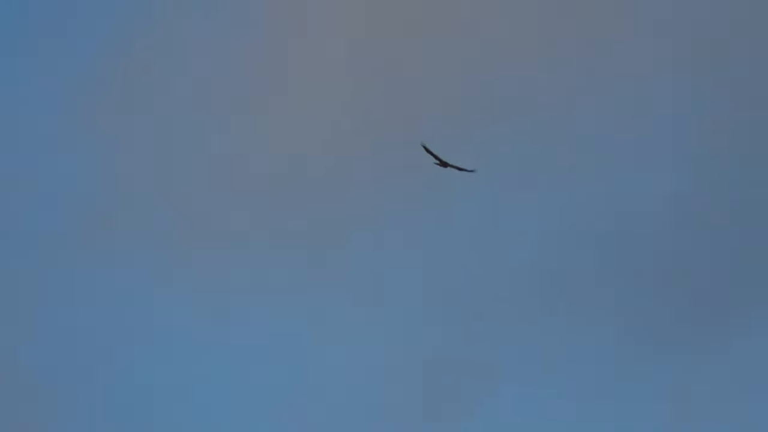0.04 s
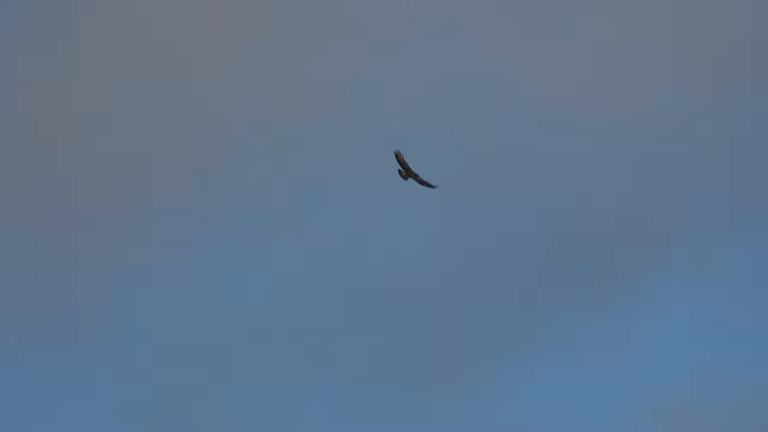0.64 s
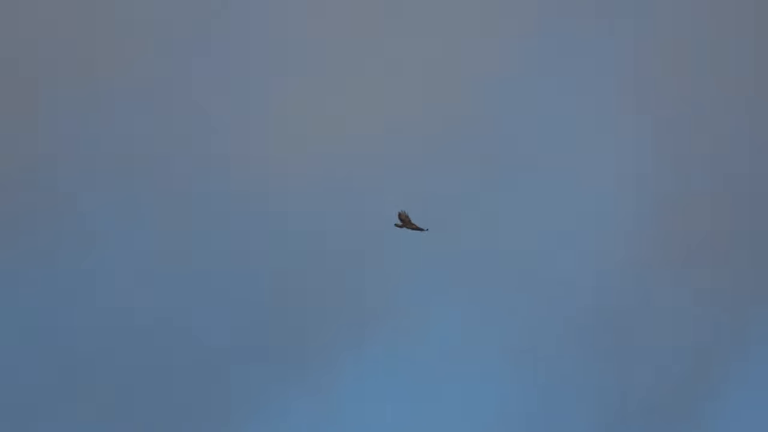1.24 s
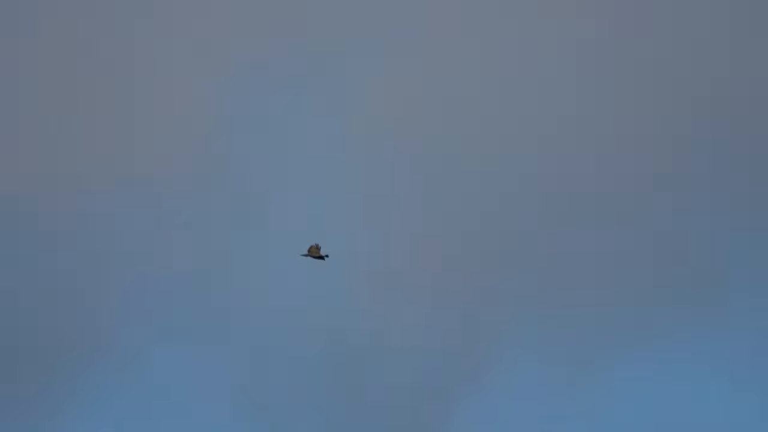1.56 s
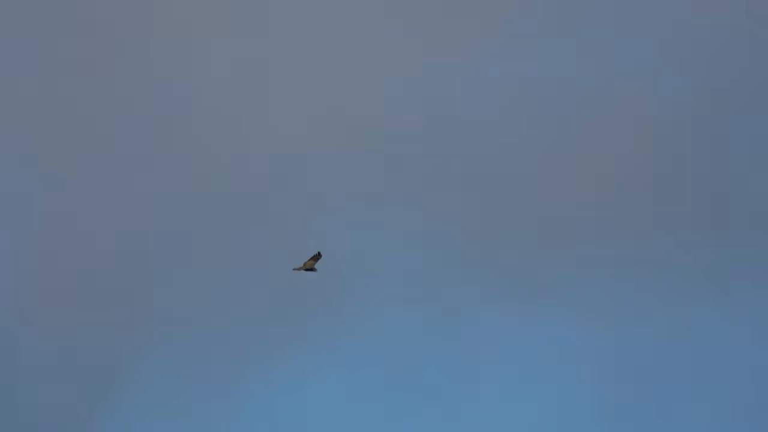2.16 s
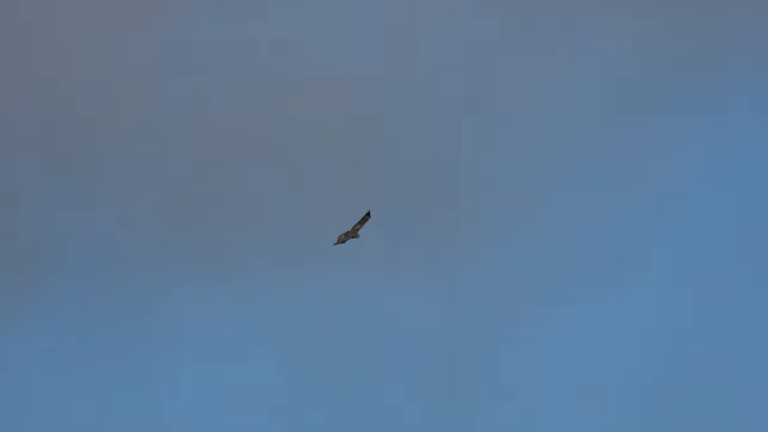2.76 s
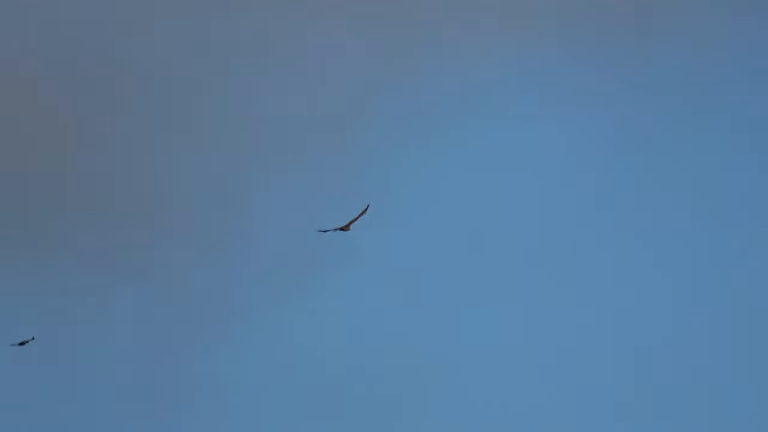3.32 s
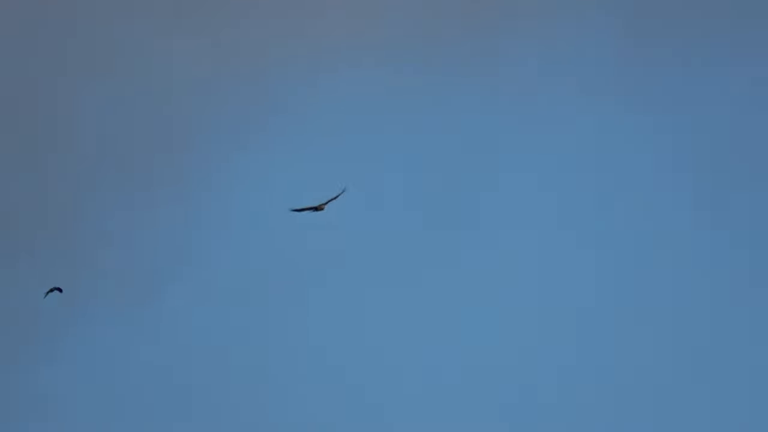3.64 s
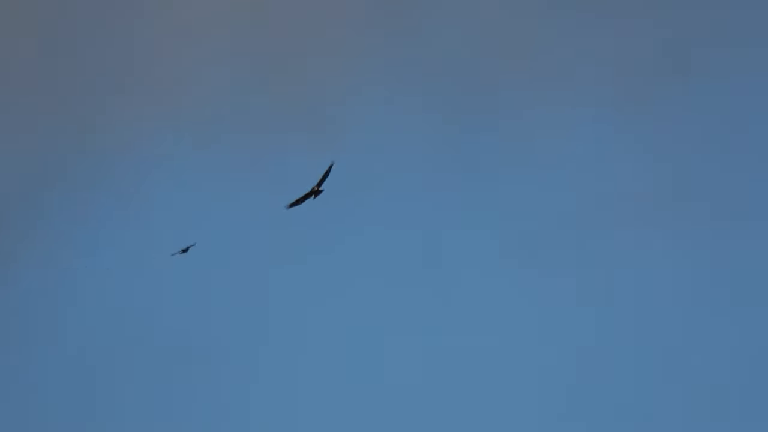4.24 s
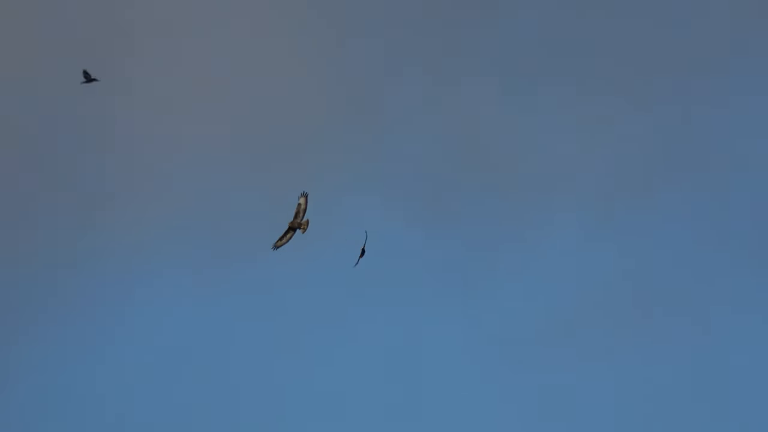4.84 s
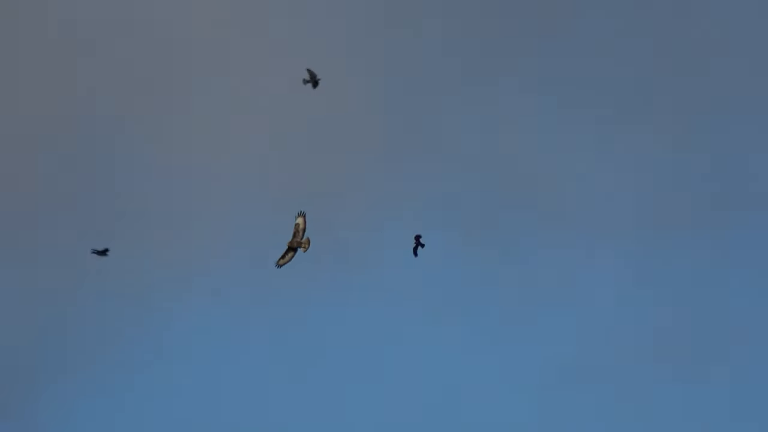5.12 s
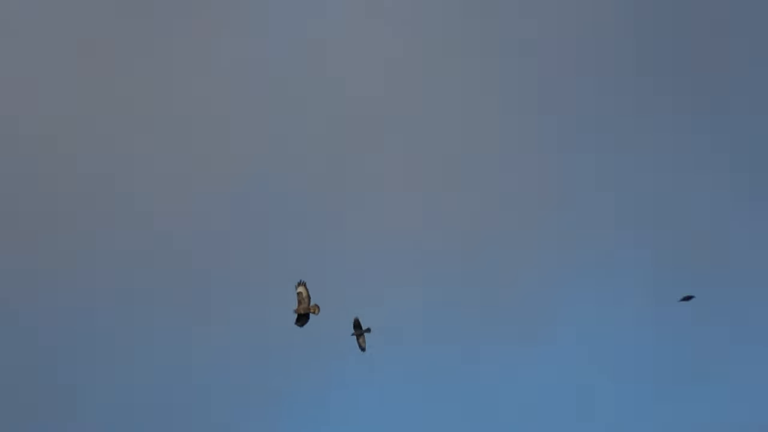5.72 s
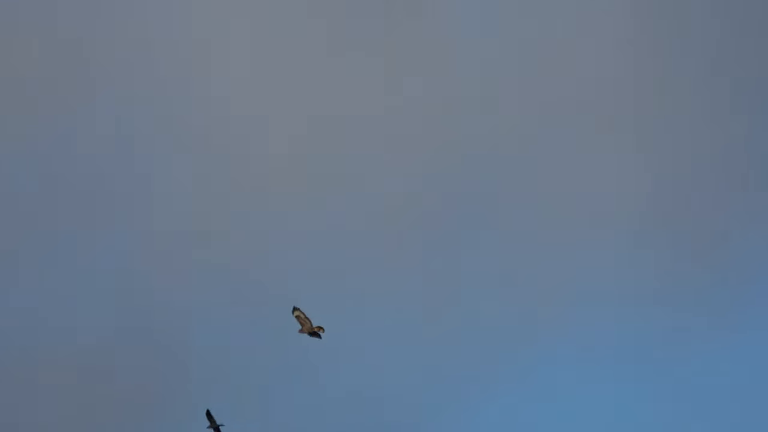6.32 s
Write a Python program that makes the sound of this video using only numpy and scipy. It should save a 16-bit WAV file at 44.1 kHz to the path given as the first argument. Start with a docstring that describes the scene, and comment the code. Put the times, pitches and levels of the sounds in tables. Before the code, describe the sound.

Low, uneven wind gusts rumble and thump on the microphone throughout, in open country. Underneath lie the dull wash of a distant road, a slight hiss and the very faint, rapid ticking of a lens motor. During the first 2.5 seconds small birds give a few quiet chirps and a high twitter. At about 2.8 seconds a bird of prey gives a soft, falling mew lasting half a second. Around 3.5 seconds the wind hits hardest, and everything dips in volume for a moment. A distant car comes slightly nearer around 4.4 seconds, then fades. From about 4 to 5.7 seconds birds give short, falling yelps, loudest near 4.8 seconds, with a faint rattle just after and thin, high buzzing whistles. The camera body creaks softly near 3.4 and 5.2 seconds. The gusts carry on to the end.

```python
"""Open country: from the start, gusts buffet a camera's microphone over the wash of a far road, while
small birds chirp, whistle and buzz and the lens motor ticks faintly 25 times a second.
Near 3 s a bird of prey gives a long falling mew. Then the wind hits hardest, and the camera's limiter,
an automatic volume control, turns everything down for a moment. Around 4.4 s a car comes a little
nearer; short bird yelps and a rattle follow, and the gusts go on to the end."""
import sys
import numpy as np
from scipy import signal
from scipy.fft import rfft, irfft
from scipy.io import wavfile
from scipy.ndimage import uniform_filter1d, minimum_filter1d

SR = 44100
rng = np.random.default_rng(int(sys.argv[2]) if len(sys.argv) > 2 else 0)


def generate_wav(sig):
    """Save sig (samples, or channels by samples) to the path in sys.argv[1] as 16-bit PCM at SR."""
    pcm = np.round(np.clip(np.atleast_2d(sig).T, -1, 1) * 32767).astype(np.int16)
    wavfile.write(sys.argv[1], SR, pcm)


N = 290178
T = np.arange(N) / SR


def gain_of(db):
    """Turns decibels into a factor to multiply a sound by."""
    return 10 ** (np.asarray(db) / 20)


def evened(x):
    """Scales a signal to an average power of 1."""
    return x / np.sqrt(np.mean(x ** 2) + 1e-20)


def follow(rows, t=T):
    """Joins a table's points with straight lines and reads each column at the times t."""
    times, *columns = np.transpose(rows)
    return [np.interp(t, times, column) for column in columns]


def add(mix, start_s, sound):
    """Lays a sound into the mix at its start time."""
    part = mix[round(start_s * SR):][:len(sound)]
    part += sound[:len(part)]


def noise(spectrum):
    """Noise of power 1; the spectrum says how strong its low and high frequencies are."""
    hz, db = np.transpose(spectrum)
    bins_hz = np.fft.rfftfreq(N, 1 / SR)
    colour = gain_of(np.interp(np.log(bins_hz + 1), np.log(hz), db))
    return evened(irfft(rfft(rng.standard_normal(N)) * colour, N))


def drift(per_s, size=N):
    """A wandering curve that heads for a new random value per_s times a second."""
    points = rng.standard_normal(4096)
    return np.interp(np.arange(size) * per_s / SR, np.arange(len(points)), points)


def sine(hz):
    """A sine wave whose frequency follows hz."""
    return np.sin(2 * np.pi * np.cumsum(hz) / SR)


def hiss():
    """The microphone's own faint noise."""
    loudness = [(0, -60.5), (2.5, -59.5), (4, -62), (5.1, -61.5), (5.7, -63), (6.58, -64.5)]  # hiss over time: t/s, level/dB
    spectrum = [(1000, -8), (4500, -4), (6300, 1.5), (7400, 1.5), (9000, 1.5), (15500, 0.2)]  # its bright tone: f/Hz, level/dB
    return gain_of(follow(loudness)[0]) * noise(spectrum)


def road(traffic_db=3.0, waver_db=0.5):
    """Far tyre noise, dulled by the air and wavering with the wind; one car stands out."""
    traffic_level = [(0, -38.5), (1.8, -39), (3.1, -40.5), (3.7, -40), (4.2, -40), (5.0, -41), (5.6, -41.5),
                     (6.05, -44), (6.58, -43)]  # the steady wash: t/s, level/dB
    traffic_spectrum = [(60, -15.5), (200, 4.5), (330, 1), (480, 0), (650, -.5), (900, 1), (1250, -5.5),
                        (1550, -6.5), (1900, -13), (2800, -18.5), (3600, -21.5), (4300, -29), (5200, -34),
                        (9000, -53)]  # its dull tone: f/Hz, level/dB
    car_level = [(0, -49), (2.8, -53), (3.7, -47), (4.4, -42.5), (5.0, -45.5), (5.6, -54), (6.58, -65.5)]  # one car comes nearer and leaves: t/s, level/dB
    car_spectrum = [(400, -22.5), (900, -3.5), (1250, -1.5), (1520, 0), (1800, -11), (2600, -12.5),
                    (5000, -41)]  # its brighter tyres: f/Hz, level/dB
    traffic = gain_of(follow(traffic_level)[0] + traffic_db) * noise(traffic_spectrum)
    car = gain_of(follow(car_level)[0]) * noise(car_spectrum)
    return gain_of(waver_db * drift(9)) * (traffic + car)


def lens_motor(level_db=-1, steps_per_s=25, first_s=.021, sharpness=5.7, whirr=0.44, uneven_db=3.0):
    """The motor moves in small, uneven steps; each rasps in the lens barrel over a weak whirr."""
    loudness = [(0, -50.5), (.55, -48), (1.75, -60.5), (2.25, -45.5), (2.8, -48), (3.5, -51.5), (3.8, -48),
                (4.4, -49.5), (5.0, -63.5), (5.5, -53.5), (5.9, -66), (6.58, -63)]  # the motor over time: t/s, level/dB
    barrel_ring = [(900, -31), (1800, -10.5), (2100, 5.5), (2350, 6.5), (2600, -1), (2900, -12),
                   (3500, -9.5), (4600, -30), (8000, -44.5)]  # how the barrel rings: f/Hz, level/dB
    steps = np.exp(sharpness * (np.cos(2 * np.pi * steps_per_s * (T - first_s)) - 1))
    drive = evened(whirr + steps * gain_of(uneven_db * drift(steps_per_s)))
    return gain_of(follow(loudness)[0] + level_db) * drive * noise(barrel_ring)


def body_creaks(rise_s=0.0028, decay_s=0.022):
    """The camera body creaks in the hand: a short, dull rasp."""
    creaks = [(3.38, -40.5), (5.245, -41.5)]  # each creak: t/s, level/dB
    body_ring = [(800, -21), (2200, 0.5), (2700, 9.5), (3400, -6), (5400, -16.5), (7000, -34), (12000, -41)]  # how the body rings: f/Hz, level/dB
    t = np.arange(SR // 5) / SR
    shape = (1 - np.exp(-t / rise_s)) * np.exp(-t / decay_s)
    strength = np.zeros(N)
    for start_s, db in creaks:
        add(strength, start_s, gain_of(db) * shape)
    return strength * noise(body_ring)


def echoes(sound, fade_s):
    """Scattered reflections from trees and ground that fade by 60 dB in fade_s."""
    t = np.arange(SR // 2) / SR
    bounces = rng.standard_normal(len(t)) * (rng.random(len(t)) < .05)
    bounces *= gain_of(-60 * t / fade_s)
    return signal.fftconvolve(sound, evened(bounces) / np.sqrt(len(t)))[:N]


def raspy_note(length_s, start_hz, end_hz, db, arch=0.039, rasp=0.065):
    """A gliding, arched note; a fast random shake of its pitch makes it raspy."""
    progress = np.linspace(0, 1, round(length_s * SR))
    glide_hz = start_hz + (end_hz - start_hz) * progress
    hz = glide_hz * (1 - arch * (2 * progress - 1) ** 2 + rasp * drift(900, len(progress)))
    return np.sqrt(2) * gain_of(db) * signal.windows.tukey(len(hz), .6) * sine(hz)


def far_birds():
    """Calls blurred by the trees: only their echoes carry this far."""
    notes = [(.14, .14, 7600, 6900, -70), (.65, 0.19, 7800, 6900, -70), (0.728, 0.59, 3440, 3320, -63),
             (1.38, 0.18, 7660, 6900, -71), (1.725, .26, 5270, 5600, -71), (2.66, .32, 7650, 7100, -72),
             (4.07, 0.09, 6500, 6000, -68), (4.652, 0.086, 1935, 2100, -49),
             (5.228, 0.34, 2754, 2716, -58.5), (5.59, 0.11, 2370, 1984, -52.5)]  # far calls: t/s, length/s, start f/Hz, end f/Hz, level/dB
    calls = np.zeros(N)
    for start_s, *note in notes:
        add(calls, start_s, raspy_note(*note, arch=0.0091, rasp=0.04))
    return echoes(calls, fade_s=0.32)


def whistle(hz, db, flicker_db=1.5):
    """A pure tone that glides along hz, its level flickering a little."""
    level = gain_of(db + flicker_db * drift(90, len(hz)))
    return np.sqrt(2) * level * sine(hz) * signal.windows.tukey(len(hz), .06)


def phrase(curve, waver=0.0057):
    """A slightly wavering whistle that follows a curve of pitch and level."""
    t = np.arange(curve[0][0], curve[-1][0], 1 / SR)
    hz, db = follow(curve, t)
    return whistle(hz * (1 + waver * drift(69, len(t))), db)


def buzz(length_s, start_hz, end_hz, db, trill_hz=175, depth_hz=180, rasp_hz=60, ends_db=-7):
    """A whistle that sinks faster and faster; a quick, unsteady trill of the pitch makes it buzz."""
    size = round(length_s * SR)
    progress = np.linspace(0, 1, size)
    trill = sine(trill_hz * (1 + .28 * drift(130, size)))
    trill *= gain_of(5 * drift(35, size))  # the trill comes in patches
    glide_hz = start_hz + (end_hz - start_hz) * progress ** 1.5 + 100 * drift(45, size)
    level_db = db + ends_db * (2 * progress - 1) ** 2 + 2.5 * drift(50, size)
    return whistle(glide_hz + depth_hz * trill + rasp_hz * drift(200, size), level_db)


def warble(length_s, start_hz, top_hz, db, climb_s=0.027, swings_per_s=26, depth_hz=100, rasp_hz=45):
    """A whistle that climbs to its top and grows louder, its pitch swinging on the way."""
    t = np.arange(0, length_s, 1 / SR)
    climb_hz = top_hz + (start_hz - top_hz) * np.exp(-t / climb_s)
    swing_hz = depth_hz * np.cos(2 * np.pi * swings_per_s * t)
    level_db = db - 9 * (1 - t / length_s) ** 2
    return whistle(climb_hz - swing_hz + rasp_hz * drift(400, len(t)), level_db)


def peep(length_s, hz, db, rise=0.034, ends_db=-10):
    """A short, soft whistle that rises a little and is loudest in its middle."""
    from_middle = np.linspace(-1, 1, round(length_s * SR))
    return whistle(hz * (1 + rise * from_middle / 2), db + ends_db * from_middle ** 2)


def yelp(length_s, start_hz, end_hz, db, rasp=.015, fade_db=1.8):
    """A short, clear note whose pitch drops faster and faster."""
    progress = np.linspace(0, 1, round(length_s * SR))
    glide_hz = start_hz + (end_hz - start_hz) * progress ** 1.5
    hz = glide_hz * (1 + rasp * drift(560, len(progress)))
    level = gain_of(db - fade_db * progress) * signal.windows.tukey(len(hz), .45)
    return np.sqrt(2) * level * sine(hz)


def clear_calls():
    """The birds' whistles and yelps, each a single gliding tone."""
    mew = [(2.825, 2620, -61), (2.858, 2850, -47.5), (2.915, 2830, -52.5), (2.975, 2680, -45.5),
           (3.06, 2590, -56), (3.11, 2440, -53), (3.21, 2290, -58), (3.3, 2170, -54)]  # the falling cry of a bird of prey: t/s, f/Hz, level/dB
    twitter = [(2.357, 6000, -66), (2.369, 7200, -55), (2.388, 5800, -72), (2.4, 7900, -59),
               (2.411, 7500, -53), (2.426, 6200, -53), (2.44, 7700, -61)]  # a quick call that swings up and down: t/s, f/Hz, level/dB
    buzzes = [(4.295, 0.28, 8200, 6630, -55.5), (4.973, .265, 7950, 6800, -62.5),
              (5.697, .27, 7950, 6580, -69), (6.33, 0.26, 7760, 6740, -66)]  # thin, sinking calls: t/s, length/s, start f/Hz, end f/Hz, level/dB
    warbles = [(3.06, 0.052, 7250, 8400, -59), (3.735, 0.082, 7100, 8260, -53),
               (5.047, .175, 7980, 8500, -60)]  # thin, climbing calls: t/s, length/s, start f/Hz, top f/Hz, level/dB
    peeps = [(.872, 0.04, 4440, -64), (1.078, .07, 4380, -67), (6.065, 0.059, 4190, -58)]  # thin, pure notes: t/s, length/s, f/Hz, level/dB
    yelps = [(2.3, .049, 1880, 1770, -48), (3.955, 0.018, 2430, 2020, -37.5), (4.206, .04, 2360, 1800, -45),
             (4.418, .025, 2390, 2240, -39), (4.763, 0.046, 2390, 1945, -31),
             (4.815, 0.028, 2450, 1970, -43), (4.862, .031, 2190, 1910, -34),
             (4.893, .036, 1855, 1470, -41), (4.905, 0.0365, 2420, 1890, -41.5),
             (5.018, 0.029, 1910, 1900, -46), (5.102, .022, 2060, 1950, -44.5),
             (5.237, 0.034, 2070, 1860, -39.5), (5.612, 0.037, 2950, 2370, -49),
             (5.644, 0.04, 2850, 2280, -51)]  # short, falling notes: t/s, length/s, start f/Hz, end f/Hz, level/dB
    calls = np.zeros(N)
    for curve in (mew, twitter):
        add(calls, curve[0][0], phrase(curve))
    for voice, notes in ((buzz, buzzes), (warble, warbles), (peep, peeps), (yelp, yelps)):
        for start_s, *note in notes:
            add(calls, start_s, voice(*note))
    return calls


def chirps(tick_s=0.027, tick_hz=5600):
    """Sparrow-like chirps: a high tick, then the same falling run of quick flicks each time."""
    entries = [(0.077, 0.98, -46.5, -55), (.592, 1.13, -58, -57), (1.213, .99, -49, -66),
               (1.378, 1.02, -55, -55), (2.021, .99, -45.5, -70), (5.305, 1, -58, -73.5)]  # each chirp: t/s, pitch factor, flick level/dB, tick level/dB
    flicks = [(.005, 0.015, 4040, 4450, -3), (0.018, .012, 5100, 4700, -4), (.023, 0.019, 4060, 3850, 2),
              (0.04, .022, 3840, 3500, 3), (.067, .016, 3230, 3000, -2)]  # its notes: delay/s, length/s, start f/Hz, end f/Hz, added level/dB
    calls = np.zeros(N)
    for start_s, pitch, db, tick_db in entries:
        add(calls, start_s, raspy_note(tick_s, tick_hz, tick_hz, tick_db))
        for delay_s, length_s, start_hz, end_hz, added_db in flicks:
            flick = raspy_note(length_s, pitch * start_hz, pitch * end_hz, db + added_db)
            add(calls, start_s + delay_s, flick)
    return calls


def rattle(length_s=.14, db=-52, sweeps_per_s=120, sag_hz_per_s=2800, ends_db=-13, flicker_db=3):
    """A bird's rattle: quick, uneven upward sweeps, loudest and widest halfway through."""
    t = np.arange(0, length_s, 1 / SR)
    off_centre = (2 * t / length_s - 1) ** 2
    top_hz = 6600 - sag_hz_per_s * t
    span_hz = 2100 * (1 - .55 * off_centre)
    pace = sweeps_per_s * (1 + 0.18 * drift(70, len(t)))
    sweep = np.cumsum(pace) / SR % 1  # runs from 0 to 1 in each sweep
    hz = top_hz - span_hz * (1 - sweep) ** 2 + 200 * drift(900, len(t))
    level = gain_of(db + ends_db * off_centre + flicker_db * drift(180, len(t)))
    pulses = np.sqrt(np.sin(np.pi * sweep))
    return np.sqrt(2) * level * pulses * sine(hz)


def birds():
    """Whistles and yelps arrive with little echo; chirps and rattle ring on briefly in the trees."""
    clear = clear_calls()
    in_trees = chirps()
    add(in_trees, start_s=4.855, sound=rattle())
    direct = gain_of(-1) * clear + gain_of(-1.5) * in_trees
    clear_echo = gain_of(-12) * echoes(clear, fade_s=.25)
    tree_echo = gain_of(-8.5) * echoes(in_trees, fade_s=0.61)
    return direct + clear_echo + tree_echo


def eddies(spectrum, smooth_samples=2600):
    """The pressure of swirling air, its own slow swells evened out so that the gusts set its strength."""
    pressure = noise(spectrum)
    power = uniform_filter1d(pressure ** 2, smooth_samples)
    power = uniform_filter1d(power, smooth_samples)
    return evened(pressure / np.sqrt(power + 1e-6))


def gust(length_s, rise_s=0.023, fall_s=0.027):
    """The strength of one gust: it rises, holds and dies away."""
    t = np.arange(0, length_s + 6 * fall_s, 1 / SR)
    return np.minimum(t / rise_s, 1) * np.exp(-np.maximum(t - length_s, 0) / fall_s)


def wind_levels():
    """The wind's deep push and lighter flutter in dB: each gust adds its power to the breeze."""
    breeze = [(.15, -25, -31.5), (.3, -22, -29.5), (.48, -16, -35.5), (.9, -15, -29), (1.2, -21, -29.5),
              (2.0, -16, -30), (2.5, -15.5, -28), (3.0, -13.5, -30.5), (3.7, -14, -22.5), (4.1, -17, -30.5),
              (5.1, -12.5, -27.5), (5.68, -16.5, -33), (6.3, -14.5, -19), (6.58, -12.5, -22)]  # the air between gusts: t/s, push level/dB, flutter level/dB
    gusts = [(0.016, 0.071, -12.5, -44), (0.547, 0.063, -6, -17.5), (0.644, 0.067, -11, -22),
             (0.761, .06, -8, -38), (1.283, 0.16, -13, -44), (1.51, 0.079, -7, -26),
             (1.692, 0.21, -9.5, -22.5), (2.138, 0.093, -13, -26), (2.355, 0.036, -5.5, -20.5),
             (2.65, 0.02, -7.5, -30), (2.711, 0.062, -8.5, -19), (2.946, 0.025, -5.5, -44),
             (3.075, 0.22, -10.5, -20), (3.374, 0.099, -8.5, -18), (3.44, 0.085, -3.5, -14.5),
             (3.525, 0.094, -4, -18.5), (3.802, .2, -9.5, -22.5), (4.191, 0.091, -9.5, -22),
             (4.335, 0.14, -12, -25), (4.49, 0.085, -6.5, -20), (4.688, 0.056, -11, -33),
             (4.842, 0.083, -9, -25), (5, 0.14, -11.5, -18.5), (5.24, 0.12, -5, -19),
             (5.371, .16, -8.5, -23), (5.76, 0.33, -9, -25.5), (6.178, .15, -5.5, -19.5),
             (6.48, 0.053, -11, -21)]  # blows on the microphone: t/s, length/s, push level/dB, flutter level/dB
    push_power, flutter_power = (gain_of(db) ** 2 for db in follow(breeze))
    for start_s, length_s, push_db, flutter_db in gusts:
        add(push_power, start_s, (gain_of(push_db) * gust(length_s)) ** 2)
        add(flutter_power, start_s, (gain_of(flutter_db) * gust(length_s)) ** 2)
    return 10 * np.log10([push_power, flutter_power])


def wind(surge=0.36, surge_from_db=-7, lumps_db=1.0, flutter_lumps_db=1.9):
    """Large swirls of air thump the microphone, middling ones buffet it, small ones flutter on top."""
    large_swirls = [(5, -11), (14, -2.5), (25, -1), (43, -2.5), (62, -3), (85, -18.5), (120, -28.5),
                    (170, -50), (300, -64.5), (700, -100)]  # the deep push: f/Hz, level/dB
    middling_swirls = [(35, -17), (60, 0.5), (82, 8.5), (105, 0.5), (135, -14.5), (200, -30), (500, -81.5)]  # the buffeting: f/Hz, level/dB
    small_swirls = [(50, -28.5), (85, -8.5), (120, 2), (160, -6), (200, -11.5), (280, -20), (400, -31),
                    (700, -39), (1500, -57.5), (5000, -85)]  # the flutter: f/Hz, level/dB
    # faster wind feeds the middling swirls: t/s, level/dB against the large ones
    middling_level = [(0, -17), (.7, -9.5), (1.2, -17.5), (2.4, -12), (3.0, -11), (3.6, -4.5), (4.4, -7),
                      (5.2, -7), (5.7, -9), (6.25, -4.5), (6.58, -8)]
    push_db, flutter_db = wind_levels()
    rumble = eddies(large_swirls) + gain_of(follow(middling_level)[0]) * eddies(middling_swirls)
    flutter = gain_of(flutter_lumps_db * drift(30)) * eddies(small_swirls)
    pressure = gain_of(push_db - 1) * rumble + gain_of(flutter_db - 1.5) * flutter
    surge_db = surge * np.maximum(push_db - surge_from_db, 0)  # the hardest gusts pass full scale
    return pressure * gain_of(surge_db + lumps_db * drift(22))


def scene():
    """All sources meet at one microphone."""
    return (wind() + road() + lens_motor() + body_creaks() + birds() + far_birds() + hiss())[None]


def record(dry, release_db_per_s=130, cutoff_hz=15750):
    """The limiter briefly turns everything down when a gust passes full scale; the top treble is cut."""
    over_db = 20 * np.log10(np.maximum(abs(dry[0]), 1))
    release_db = T * release_db_per_s
    duck_db = np.maximum.accumulate(over_db + release_db) - release_db  # ducks at once, recovers steadily
    held_gain = minimum_filter1d(gain_of(-duck_db), size=90)
    smooth_gain = uniform_filter1d(held_gain, size=90)
    treble_cut = signal.firwin(511, cutoff_hz, window=("kaiser", 9), fs=SR)
    return signal.oaconvolve(dry * smooth_gain, treble_cut[None], "same")


dry = scene()
out = record(dry)
generate_wav(out)
```